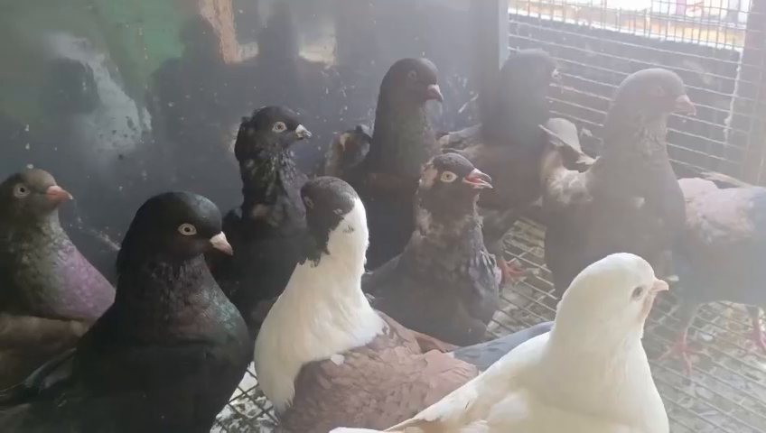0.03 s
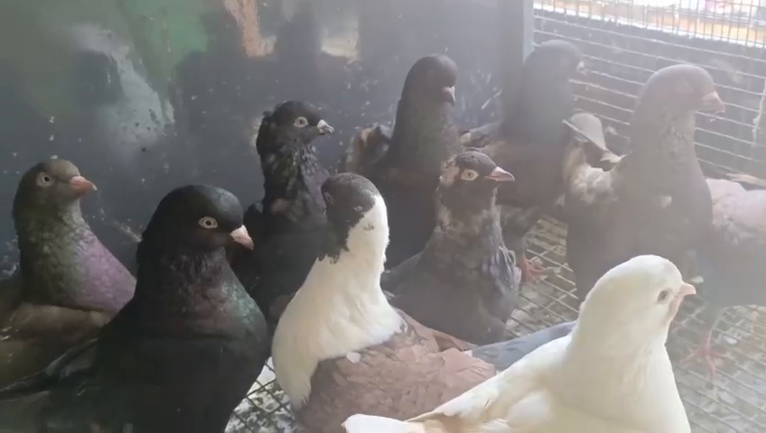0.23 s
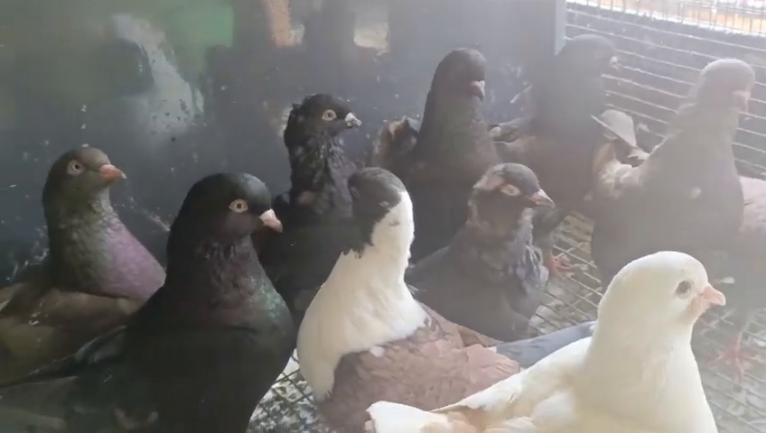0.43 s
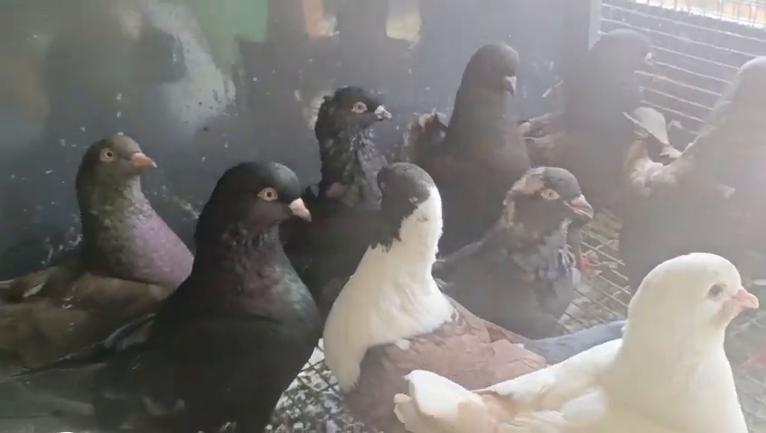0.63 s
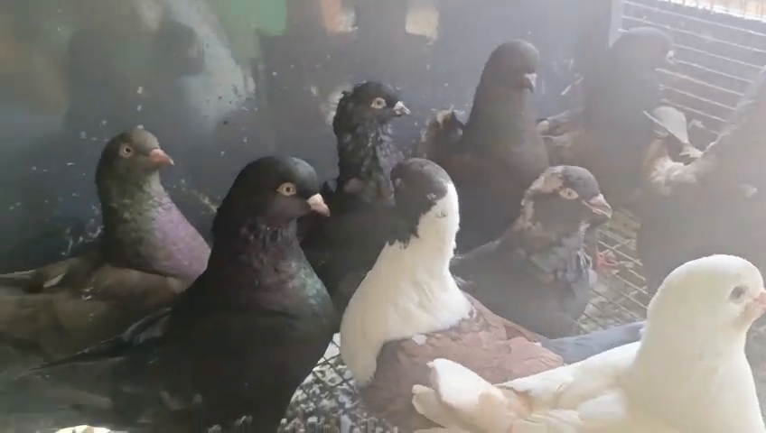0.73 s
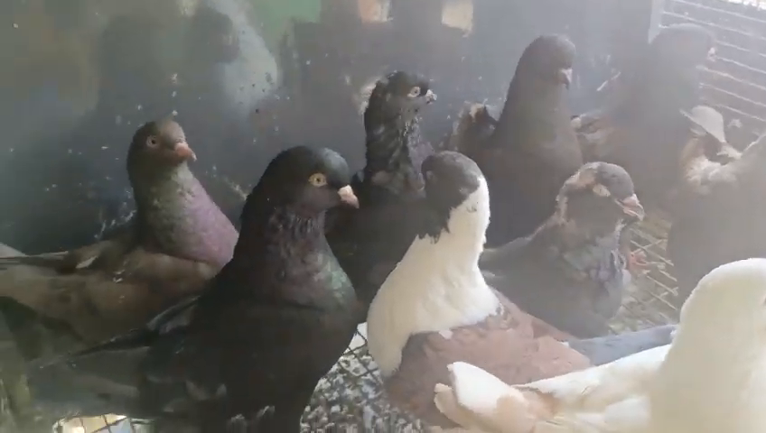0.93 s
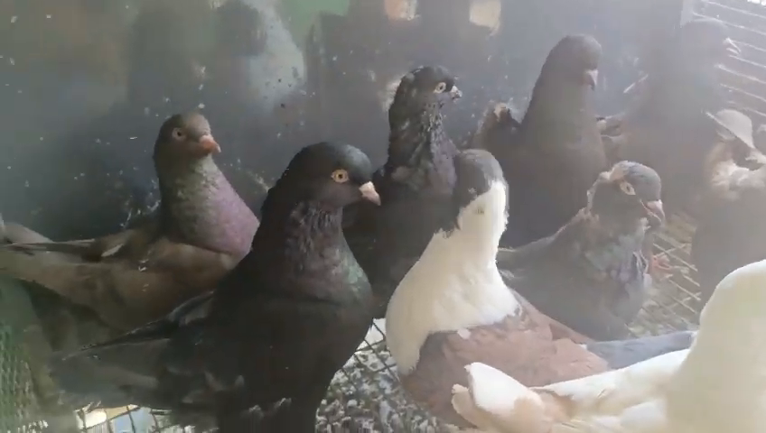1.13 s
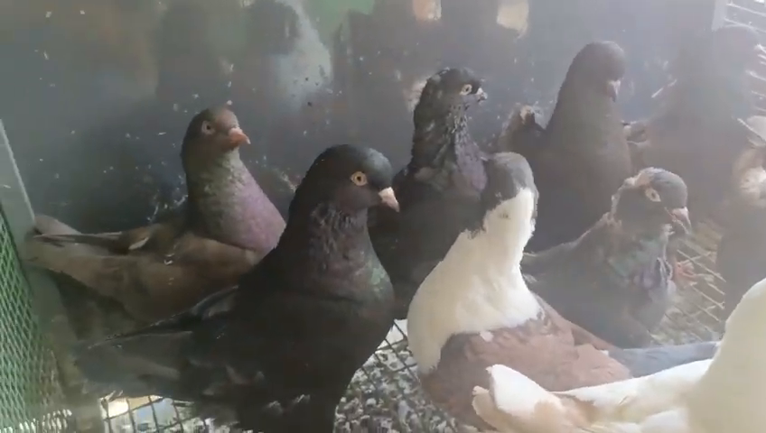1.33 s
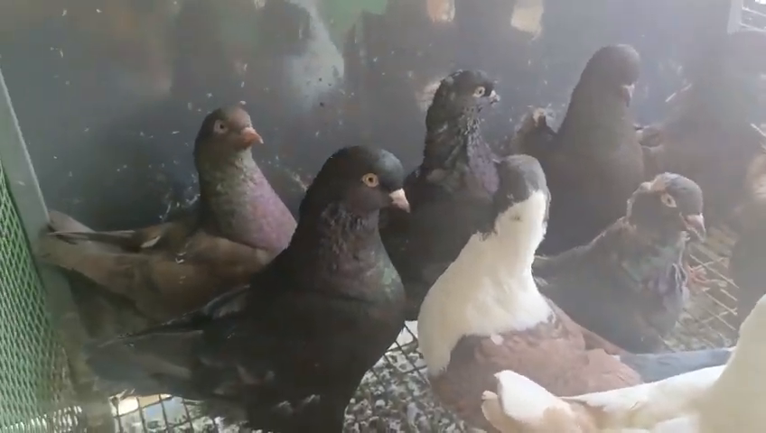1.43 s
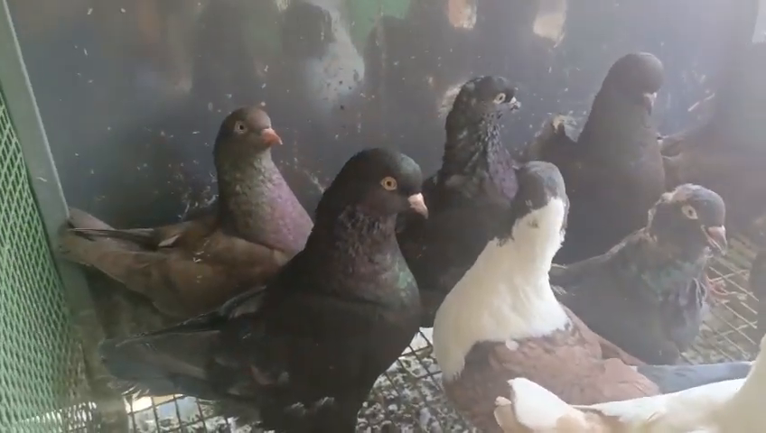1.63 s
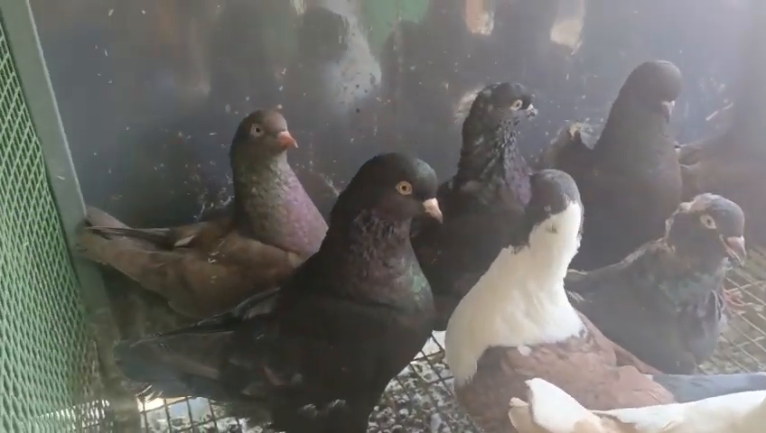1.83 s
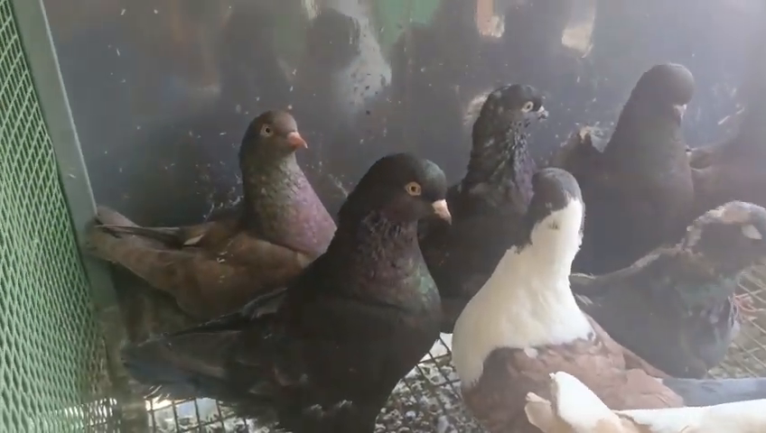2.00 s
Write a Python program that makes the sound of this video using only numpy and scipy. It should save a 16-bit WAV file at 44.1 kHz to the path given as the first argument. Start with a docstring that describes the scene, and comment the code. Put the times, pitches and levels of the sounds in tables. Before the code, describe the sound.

Several pigeons coo close by in low, throaty, overlapping tones, one answering higher, while claws tap and scuff on wire; small hard-walled cage, hand-held stereo microphone with low rumble and soft air bumps.

```python
"""Pigeons coo in a small hard-walled cage, close to a hand-held stereo microphone.
One bird to the right repeats a wavering coo, another answers at a higher pitch, with a plainer tone:
each is a few harmonics on a fluttering pitch. Short gliding calls come from further off, and a blurred
flock coos behind, made of tones and coloured noise. Feet, feathers and beaks tap, scuff and knock: noise
bursts, rattling resonances and the modes of the wire, which ring most clearly about a second in.
Below lie a low rumble, soft bumps and puffs of air on the left."""
import sys
import numpy as np
from scipy import signal
from scipy.fft import rfft, irfft
from scipy.io import wavfile

SR = 44100
rng = np.random.default_rng(int(sys.argv[2]) if len(sys.argv) > 2 else 0)


def file_out(sig):
    """Save sig as 16-bit WAV at sys.argv[1]."""
    # one column per channel
    cols = np.atleast_2d(sig).T
    # limit, then scale
    lim = np.clip(cols, -1, 1)
    pcm = np.round(lim * 32767).astype(np.int16)
    wavfile.write(sys.argv[1], SR, pcm)


N = 90978
T = np.arange(N) / SR  # seconds


def amp(db):
    """Decibels to gain."""
    return 10 ** (np.asarray(db) / 20)


def unit(x):
    """Scales to rms 1, over both channels together."""
    return x / np.sqrt(np.mean(abs(x) ** 2) + 1e-20)


def colour(x, points):
    """Filters by a spectrum of (Hz, dB) points, joined along log frequency."""
    hz, db = np.transpose(points)
    f = np.fft.rfftfreq(N, 1 / SR)
    gain = amp(np.interp(np.log(f + 1), np.log(hz), db))
    return irfft(rfft(x) * gain, N)


def noise(points, same):
    """Coloured stereo noise whose channels are partly alike (same: their correlation)."""
    left, other = rng.standard_normal((2, N))
    same = np.clip(same, -1, 1)
    right = same * left + np.sqrt(1 - same * same) * other
    return unit(colour(np.array([left, right]), points))


def wander(rate_hz):
    """Smooth random motion of rms 1, falling away above a rate."""
    f = np.fft.rfftfreq(N, 1 / SR)
    return unit(irfft(rfft(rng.standard_normal(N)) / (1 + (f / rate_hz) ** 4), N))


def level(points):
    """Gain along a (s, dB) curve."""
    return amp(np.interp(T, *np.transpose(points)))


def swell(centre, length):
    """A smooth rise and fall that lasts the given length."""
    return np.cos(np.pi * np.clip((T - centre) / length, -.5, .5)) ** 2


# The near birds, a table per coo. Each row: time in seconds, pitch in Hz, level in dB before the harmonics.
LEADING_COOS = [
    [(.17, 215.4, -59), (.21, 221, -30.5), (.25, 207.6, -52), (.29, 221.7, -33), (.34, 212, -54)],
    [(.48, 216.6, -46), (.53, 219.1, -26.5), (.58, 221, -37.5), (.62, 215.6, -31), (.665, 210.3, -35),
     (.71, 216.4, -31.5), (.765, 219, -32.5), (.85, 198.3, -44)],
    [(1.14, 207.2, -54), (1.2, 202.4, -32), (1.25, 197.6, -51), (1.29, 200.1, -34.5), (1.335, 212.7, -34.5),
     (1.37, 215.4, -35), (1.41, 202.5, -39), (1.455, 228, -30), (1.485, 215, -65)],
    [(1.45, 162.7, -36.5), (1.53, 176.3, -40), (1.63, 193.2, -35.5), (1.72, 195.8, -42), (1.79, 209.6, -35),
     (1.865, 209.1, -44), (1.915, 203.4, -29), (1.97, 211.7, -36), (2.05, 218, -26), (2.08, 217, -27)],
]
SECOND_COOS = [
    [(.18, 305, -46.5), (.28, 316.7, -35), (.32, 296, -43), (.36, 257.2, -46), (.47, 273.7, -35.5),
     (.53, 282, -51)],
    [(.93, 297.4, -51), (.968, 305.3, -37.5), (1.015, 335, -29.5), (1.07, 308, -36.5), (1.1, 300, -55)],
    [(1.15, 329.5, -57), (1.2, 330, -33), (1.24, 335, -61)],
    [(1.67, 294.5, -50), (1.75, 300.3, -36), (1.84, 308, -40.5), (1.89, 300.2, -61), (1.915, 304.7, -28.5),
     (1.98, 278.6, -53), (2.025, 323, -29), (2.07, 305, -81)],
]
# Harmonics of each voice, lowest first. Each row: level in dB, left over right microphone in dB,
# left phase lead in radians.
LEADING_VOICE = [(-15, 0.5, 0.52), (-5, -5, -2), (-15, -7.5, -2), (-22, 3.5, -3.5)]
SECOND_VOICE = [(-4, -0.45, 0.21), (-19, -2, -0.54)]
JITTER, JITTER_HZ = .007, 40  # rms share of the pitch, rate
FLUTTER, FLUTTER_HZ = 0.15, 45  # rms share of the loudness, rate
EDGE_S = 0.0092  # fade at both ends of a coo


def coo(points, voice):
    """A few harmonics on a wavering pitch, with a flutter of the throat."""
    s, hz, db = np.transpose(points)
    pitch = np.interp(T, s, hz) * (1 + JITTER * wander(JITTER_HZ))
    phase = 2 * np.pi * np.cumsum(pitch) / SR
    gate = np.clip(np.minimum(T - s[0], s[-1] - T) / EDGE_S, 0, 1)
    loud = gate * amp(np.interp(T, s, db)) * (1 + FLUTTER * wander(FLUTTER_HZ))
    tone = np.zeros((2, N))
    for k, (harmonic_db, left_db, lead) in enumerate(voice, 1):
        left = amp(left_db) * np.sin(k * phase + lead)
        right = np.sin(k * phase)
        tone += amp(harmonic_db) * np.array([left, right])
    return np.sqrt(2) * loud * tone


# Short calls and squeaks from further off. Each row: centre in seconds, length in seconds, pitch in Hz,
# glide as a share of the pitch per length, level in dB, roughness 0-1.
FAR_CALLS = [(0.791, 0.035, 560, -.04, -42, .3), (0.897, 0.038, 737, 0.33, -40, 0.42),
             (0.94, 0.11, 878, -.03, -48, 0.42), (0.999, 0.073, 758, 0.17, -43.5, 0.1),
             (1.112, 0.076, 758, -0.066, -44, 0.37), (1.25, .16, 594, 0.085, -46, 0),
             (1.225, 0.064, 750, -0.26, -43, 0.2), (1.607, 0.035, 694, 0.0031, -37, 0.3),
             (1.669, 0.046, 2198, 0.066, -40.5, 0.48), (1.67, 0.05, 1510, -0.017, -47.5, 0.9),
             (1.742, 0.061, 721, 0.047, -41, 0.34), (1.869, 0.037, 773, -0.12, -40, 0.97),
             (1.975, 0.09, 850, -0.23, -43, 0.6)]


def far_calls(rasp_share=0.11, lead=1.35):
    """Brief gliding notes, some clear and some hoarse; random flicker of the tone makes them hoarse."""
    out = np.zeros((2, N))
    for centre, length, hz, glide, db, rough in FAR_CALLS:
        pitch = hz * (1 + glide * np.clip((T - centre) / length, -1, 1))
        rough = np.clip(rough, 0, 1)
        flicker = wander(rasp_share * hz) + 1j * wander(rasp_share * hz)
        rasp = np.sqrt(2 * (1 - rough ** 2)) + rough * flicker
        note = amp(db) * swell(centre, length) * rasp * np.exp(2j * np.pi * np.cumsum(pitch) / SR)
        right = note * np.exp(1j * lead)  # phase lead in radians
        out += [note.real, right.real]
    return out


# How bright sounds lean to the left microphone. Each row: frequency in Hz, left minus right in dB.
LEFT_LEAN = [(200, -16.5), (800, 1), (1500, 4.5), (3000, 7), (4500, 10.5), (6500, 9), (8500, 4), (12000, 2),
             (16000, 13)]
LEFT_LAG_S = .0004


def lean(x):
    """Bright sounds reach the left microphone louder and a little later."""
    left = np.interp(T - round(LEFT_LAG_S * SR) / SR, T, x[0])
    right = colour(x[1], [(hz, -db) for hz, db in LEFT_LEAN])
    return np.array([left, right])


# Taps and scuffs on the floor. Each row: start in seconds, level in dB, rise in seconds,
# fall time constant in seconds, body in dB over the level (before BODY_DB), ring in dB over the level.
FLOOR_TAPS = [(0.185, -56.5, 0.0023, 0.048, 14.5, -18), (0.27, -31.5, 0.0017, 0.02, 0.5, -28),
              (0.3722, -29.5, 0.0018, 0.021, -3, -22), (0.4871, -33, 0.0017, 0.016, 3, -31),
              (0.584, -44.5, 0.0081, 0.02, 0, -11), (0.673, -32, 0.038, 0.015, -8.5, -12),
              (0.757, -41, 0.0065, 0.072, -6, -17), (0.895, -29.5, 0.00073, 0.0028, -4, -27),
              (1.017, -23, 0.01, 0.0084, -35, 0.5), (1.032, -30, 0.0075, 0.0084, -7, 0),
              (1.099, -45, 0.005, 0.0076, 5, -28), (1.162, -37, 0.017, 0.026, -5.5, -37),
              (1.42, -37.5, 0.012, 0.0065, -27, -3.5), (1.488, -45.5, 0.01, 0.019, 0, -9),
              (1.553, -42.5, 0.045, 0.031, 1.5, -36), (1.74, -40, 0.00091, 0.0047, -21, -29),
              (1.92, -46.5, 0.022, .02, -13, -22), (2.008, -42.5, 0.015, 0.014, -25, -26)]
# Spectra of the crisp part and the body of a tap. Each row: frequency in Hz, density in dB per Hz.
CRISP_SPECTRUM = [(500, -37), (1500, -6), (2600, -3.5), (3500, 1), (4800, 2.5), (6700, 3.5), (8000, -14),
                  (10500, -25), (12500, -12.5), (16000, -16)]
BODY_SPECTRUM = [(40, -29), (120, -23.5), (280, -1), (600, 4), (1250, 4.5), (2000, -7), (2700, -1.5),
                 (3350, 4.5), (4100, 2.5), (16000, -93)]
# Modes of the wire floor. Each row: frequency in Hz, relative level in dB.
WIRE_MODES = [(3833, 6), (3993, 4), (4112, 3), (4260, 3), (4447, 6), (4568, 3), (5575, 1), (5735, 0),
              (6615, 5), (6750, 6), (7218, 1), (8344, -6)]
BODY_DB, TAP_SAME, WIRE_T60_S = -2, 0.28, .05  # body trim, likeness of the channels, 60 dB decay


def taps(grain_db=1.0, grain_hz=900, clump_db=3.0, clump_hz=130):
    """Grainy bursts of claw and feather on the floor; noise in each tap's shape rings the wire modes."""
    crisp, body, ring = np.zeros((3, N))
    for s, db, rise, fall, body_db, ring_db in FLOOR_TAPS:
        decay = np.exp(-np.maximum(T - s - rise, 0) / fall)
        push = amp(db) * np.clip((T - s) / rise, 0, 1) * decay
        crisp += push
        body += push * amp(body_db)
        ring += push * amp(ring_db)
    grain = unit(amp(grain_db * wander(grain_hz) + clump_db * np.tanh(wander(clump_hz))))
    crisp_noise = crisp * noise(CRISP_SPECTRUM, TAP_SAME)
    body_noise = amp(BODY_DB) * body * noise(BODY_SPECTRUM, TAP_SAME)
    t = T[:SR // 4]
    wire = sum(amp(db - 60 * t / WIRE_T60_S) * np.sin(2 * np.pi * hz * t) for hz, db in WIRE_MODES)
    wire /= np.linalg.norm(wire)
    drive = ring * rng.standard_normal((2, N))
    rung = signal.fftconvolve(drive, wire[None], axes=1)[:, :N]
    return lean(grain * (crisp_noise + body_noise) + rung)


# Claws and beaks on different parts of the cage. Each row: start in seconds, main resonance in Hz,
# second resonance in Hz, level of the main one in dB at the left, fall time constant in seconds.
CAGE_KNOCKS = [(0.27, 3580, 1230, -34, 0.013), (0.376, 3420, 1544, -22.5, 0.0064),
               (0.896, 5420, 8500, -41.5, 0.0091), (1.1, 7600, 5540, -47, 0.019),
               (1.7415, 2540, 1605, -27, 0.0032)]
SECOND_DB, KNOCK_RISE_S = -5.5, 0.0014  # second resonance against the main one
KNOCK_RATTLE, KNOCK_RATTLE_HZ = 0.74, 280  # depth, rate
KNOCK_LEFT_DB = 6  # left over right


def knocks():
    """Each knock sets two resonances of one cage part rattling briefly."""
    out = np.zeros((2, N))
    for s, main_hz, second_hz, db, fall in CAGE_KNOCKS:
        t = np.maximum(T - s, 0)
        push = amp(db) * np.minimum(t / KNOCK_RISE_S, 1) * np.exp(-t / fall)
        for hz, gain in (main_hz, 1), (second_hz, amp(SECOND_DB)):
            flicker = wander(KNOCK_RATTLE_HZ) + 1j * wander(KNOCK_RATTLE_HZ)
            rattle = 1 + KNOCK_RATTLE * flicker
            out += gain * push * (rattle * np.exp(2j * np.pi * hz * t)).real
    return out * amp([[0], [-KNOCK_LEFT_DB]])


CAGE_T60_S, TAP_WET_DB, VOICE_WET_DB = 0.2, -4, -19  # 60 dB decay, echo against direct sound


def cage(x, wet_db):
    """Adds the short dense echo of the cage walls, a decaying noise tail."""
    t = T[:SR // 2]
    tail = rng.standard_normal((2, len(t))) * amp(-60 * t / CAGE_T60_S)
    tail *= np.minimum(t / 0.0008, 1)  # soft start
    tail /= np.linalg.norm(tail, axis=1, keepdims=True)
    return x + amp(wet_db) * signal.fftconvolve(x, tail, axes=1)[:, :N]


# Low bumps of the cage. Each row: centre in seconds, length in seconds, pitch in Hz, level in dB.
CAGE_BUMPS = [(0.305, 0.17, 128.6, -35.5), (0.394, 0.07, 145, -35), (0.484, 0.044, 105, -35.5),
              (0.739, 0.13, 133.1, -32), (0.941, 0.094, 78, -36), (0.965, 0.06, 115.6, -33),
              (1.075, 0.081, 129.2, -30), (1.171, 0.042, 138.3, -33), (1.818, 0.084, 124.1, -37),
              (2.031, 0.022, 134, -27.5)]


def bumps():
    """Soft hollow booms of the cage: swelling low tones, alike in both microphones."""
    out = np.zeros(N)
    for centre, length, hz, db in CAGE_BUMPS:
        tone = np.sin(2 * np.pi * (hz * T + rng.random()))
        out += amp(db) * swell(centre, length) * tone
    return np.sqrt(2) * out * np.ones((2, 1))


# Air buffeting the left microphone. Each row: centre in seconds, length in seconds, level in dB.
AIR_PUFFS = [(0.421, 0.048, -24.5), (0.53, 0.021, -31), (0.602, 0.2, -37.5), (0.716, 0.084, -30),
             (1.257, 0.09, -35), (1.816, 0.025, -36)]
# Spectrum of a puff. Each row: frequency in Hz, density in dB per Hz.
PUFF_SPECTRUM = [(20, 2), (60, -1), (140, 3.5), (260, -12), (450, -9.5), (1000, -23), (4000, -56)]


def puffs():
    """Moving air thuds on the left microphone only, as swells of low noise."""
    loud = sum(amp(db) * swell(centre, length) for centre, length, db in AIR_PUFFS)
    return noise(PUFF_SPECTRUM, 0) * loud * np.array([[1], [0]])


# Loudness of the blurred flock, shared by crowd and background. Each row: time in seconds, level in dB.
FLOCK_LEVEL = [(.2, -47), (.45, -39), (.62, -47.5), (.82, -44), (.92, -38.5), (1.18, -39), (1.3, -44),
               (1.55, -43), (1.8, -43.5), (1.95, -38), (2.06, -43.5)]
CROWD_HZ, CROWD_OCTAVES = 305.5, 0.16  # typical pitch, rms spread of pitch
CROWD_DB = -7  # against FLOCK_LEVEL


def crowd(count=4, turn_hz=3.5, swell_db=5, fall_db=-8):
    """Birds further back coo over one another, each gliding and swelling on its own."""
    out = np.zeros((2, N))
    for _ in range(count):
        glide = 2 ** (CROWD_OCTAVES * wander(turn_hz))
        pitch = CROWD_HZ * glide * (1 + JITTER * wander(JITTER_HZ))
        phase = 2 * np.pi * np.cumsum(pitch) / SR
        tone = np.zeros((2, N))
        for k in range(1, 4):
            start = 2 * np.pi * rng.random((2, 1))  # each microphone has its own phase
            tone += amp(fall_db * (k - 1)) * np.sin(k * phase + start)
        out += tone * amp(swell_db * np.tanh(wander(2 * turn_hz)))
    return amp(CROWD_DB) * unit(out) * level(FLOCK_LEVEL)


# Spectra of rumble, flock and rustle (before its lean). Each row: frequency in Hz, density in dB per Hz.
RUMBLE_SPECTRUM = [(20, -17), (42, -3), (70, 0.5), (100, 2), (135, 2.5), (185, -3.5), (260, -8.5),
                   (400, -15.5), (1500, -72)]
FLOCK_SPECTRUM = [(100, -5.5), (220, -10), (350, 4.5), (500, -1.5), (720, -6.5), (1050, -18.5), (2000, -16),
                  (3000, -28), (8000, -44)]
RUSTLE_SPECTRUM = [(300, -12.5), (1200, 8.5), (2600, 5), (3800, 6), (6700, 5), (8200, -7.5), (10500, -24),
                   (12500, -7), (16000, -17)]
# Loudness of rumble and rustle (before its lean and flicker). Each row: time in seconds, level in dB.
RUMBLE_LEVEL = [(.2, -40), (.4, -35.5), (.62, -37.5), (.82, -41.5), (.92, -36), (1.17, -37.5), (1.36, -42),
                (1.7, -42), (1.88, -40), (2.06, -43.5)]
RUSTLE_LEVEL = [(.2, -49), (.55, -45.5), (.95, -46), (1.15, -46), (1.33, -53), (1.55, -44), (1.8, -48.5),
                (2.06, -49)]
RUMBLE_SAME, FLOCK_SAME = 1, 0.01  # likeness of the channels


def background(rustle_db=0.93, rustle_hz=40):
    """Coloured noises: low rumble, the blurred rest of the flock, and a faint flickering rustle."""
    rumble = noise(RUMBLE_SPECTRUM, RUMBLE_SAME) * level(RUMBLE_LEVEL)
    flock = noise(FLOCK_SPECTRUM, FLOCK_SAME) * level(FLOCK_LEVEL)
    flicker = amp(rustle_db * wander(rustle_hz))
    rustle = lean(noise(RUSTLE_SPECTRUM, TAP_SAME)) * level(RUSTLE_LEVEL) * flicker
    return rumble + flock + rustle


def scene():
    """Near birds, far calls and floor sounds echo in the cage; the other layers are added without echo."""
    leading = sum(coo(points, LEADING_VOICE) for points in LEADING_COOS)
    second = sum(coo(points, SECOND_VOICE) for points in SECOND_COOS)
    birds = cage(leading + second + far_calls(), VOICE_WET_DB)
    floor = cage(taps() + knocks(), TAP_WET_DB)
    return birds + floor + crowd() + bumps() + puffs() + background()


START_S, OPEN_S, CUT_HZ = .18, .004, 16150  # opening time, fade-in, upper band limit


def record(dry):
    """The microphone opens after a moment of silence; then a low-pass sets the band limit."""
    opened = dry * np.clip((T - START_S) / OPEN_S, 0, 1)
    low_pass = signal.firwin(511, CUT_HZ, window=("kaiser", 9), fs=SR)
    return signal.oaconvolve(opened, low_pass[None], "same")


dry = scene()
out = record(dry)
file_out(out)
```